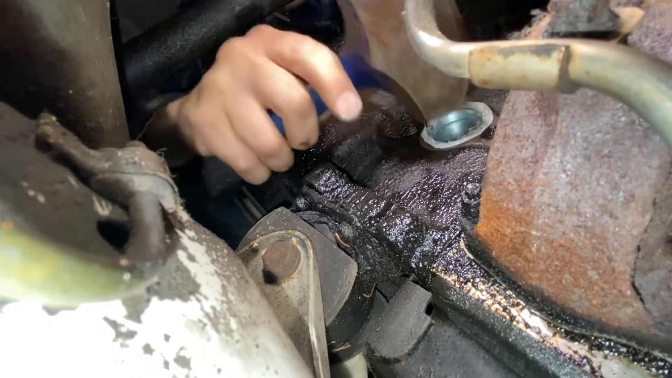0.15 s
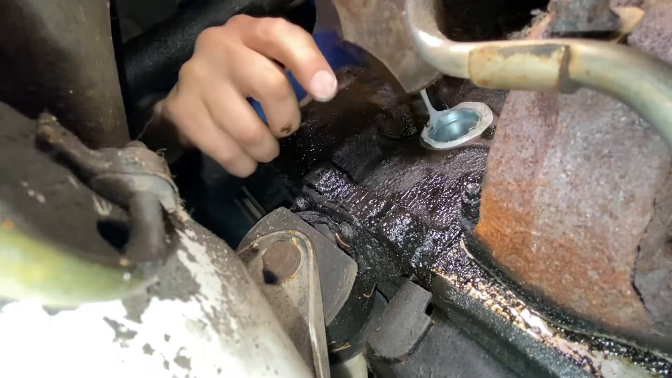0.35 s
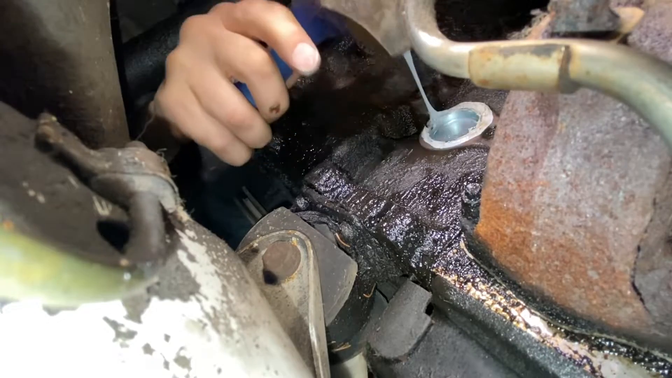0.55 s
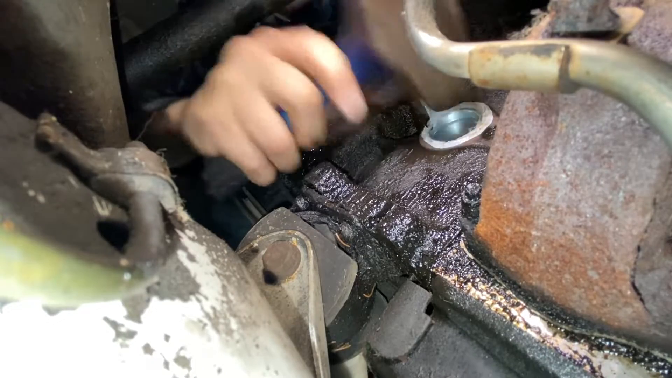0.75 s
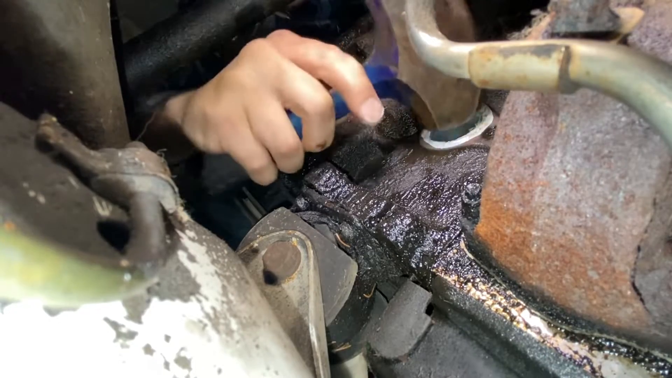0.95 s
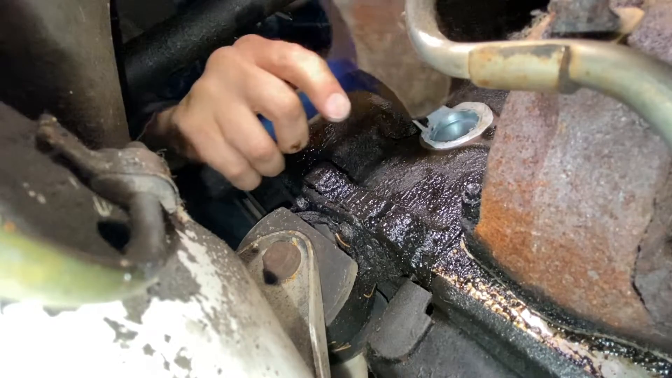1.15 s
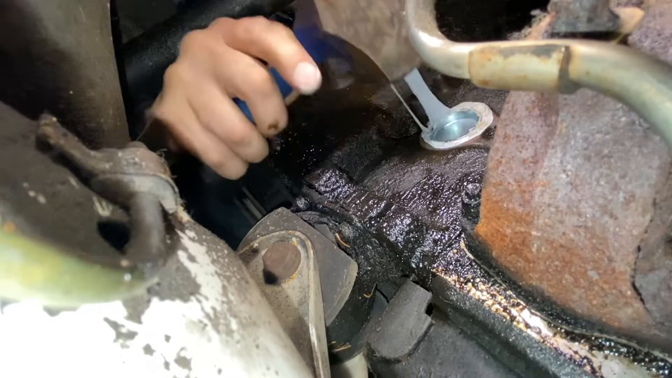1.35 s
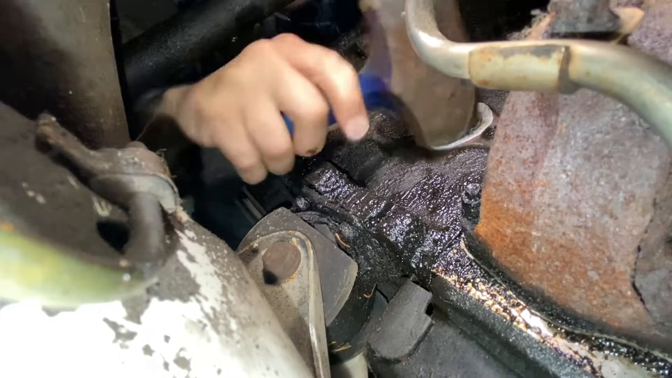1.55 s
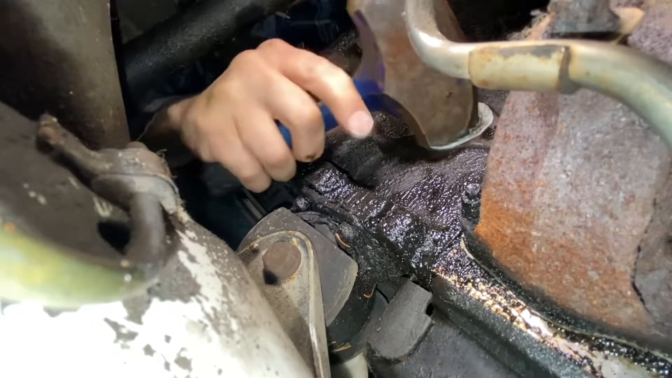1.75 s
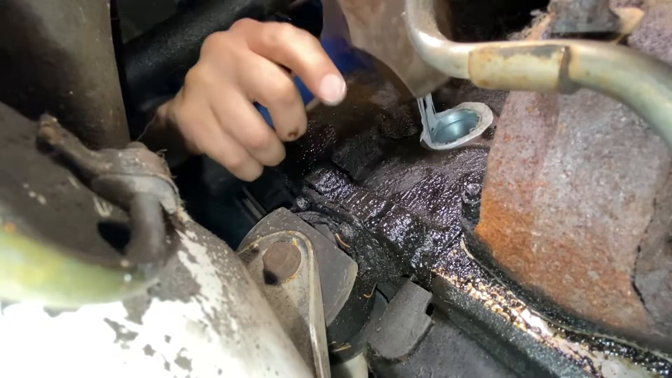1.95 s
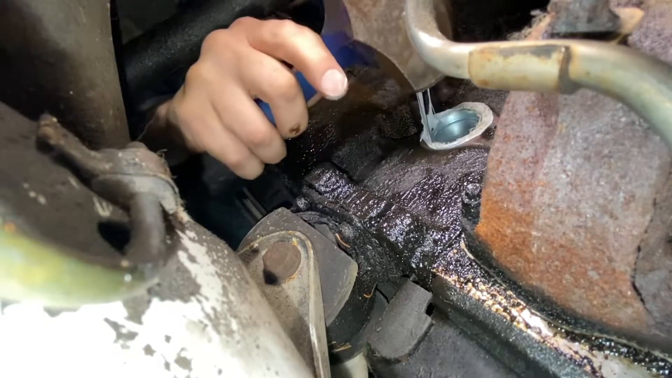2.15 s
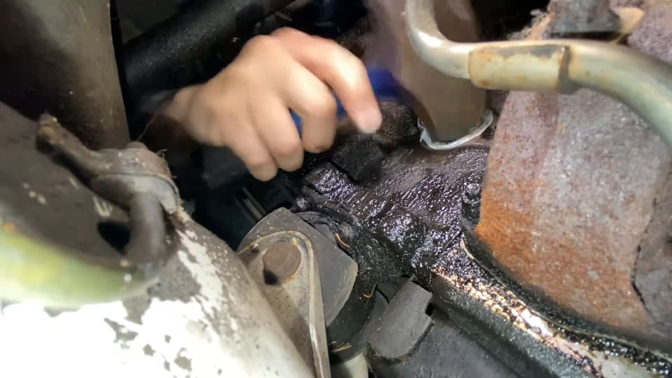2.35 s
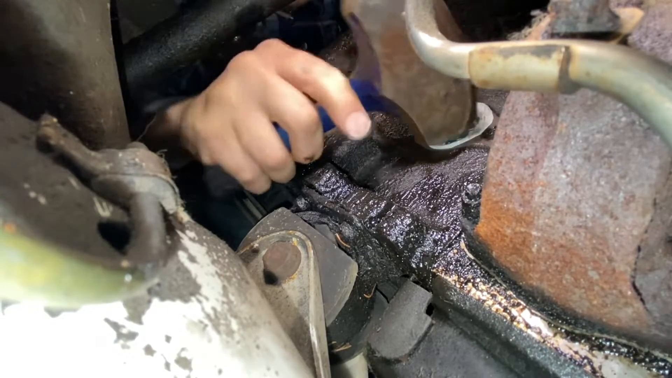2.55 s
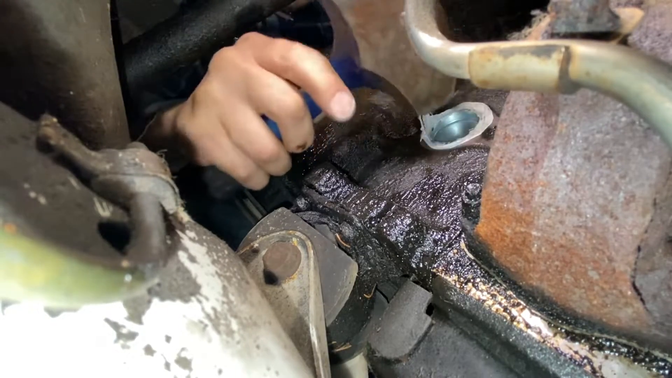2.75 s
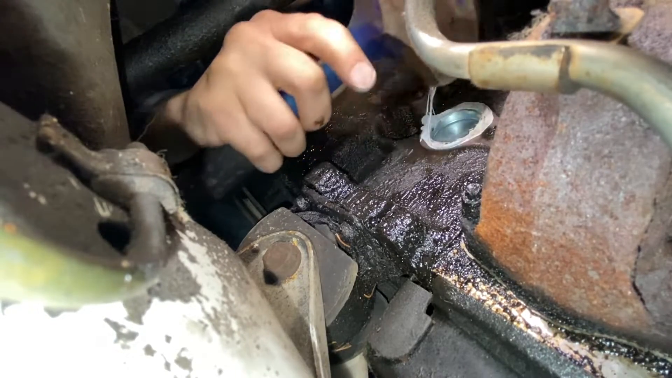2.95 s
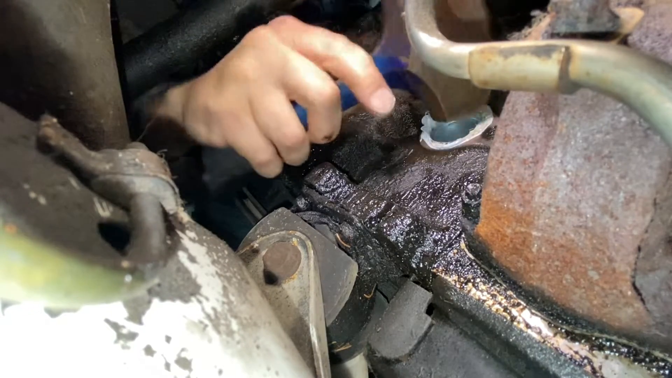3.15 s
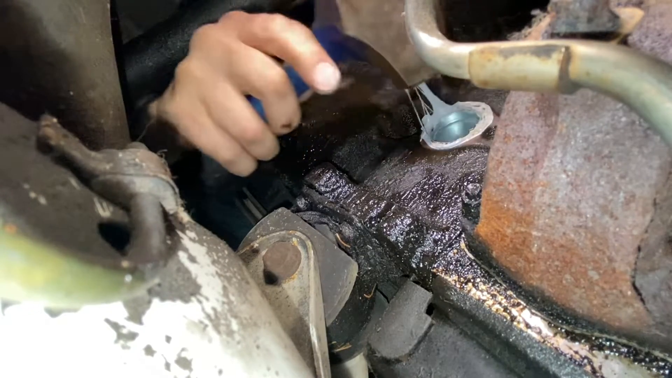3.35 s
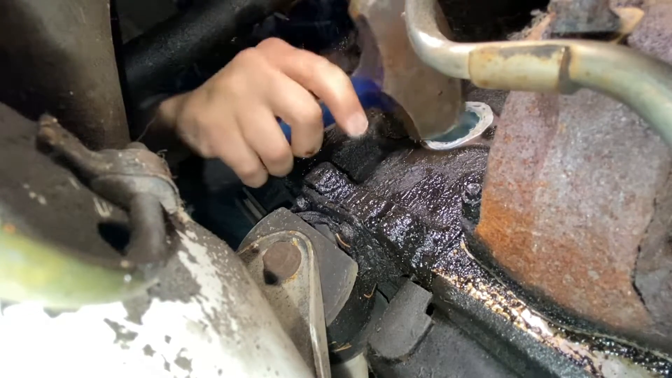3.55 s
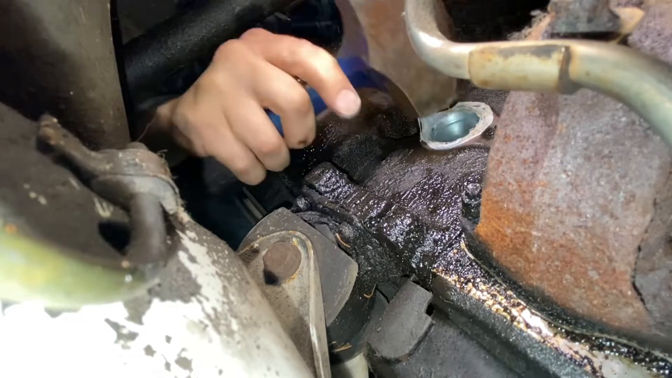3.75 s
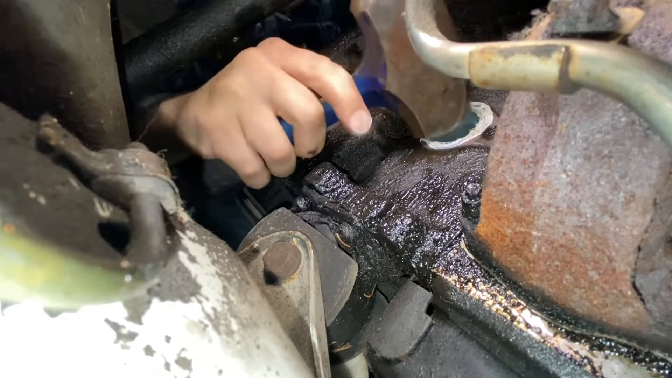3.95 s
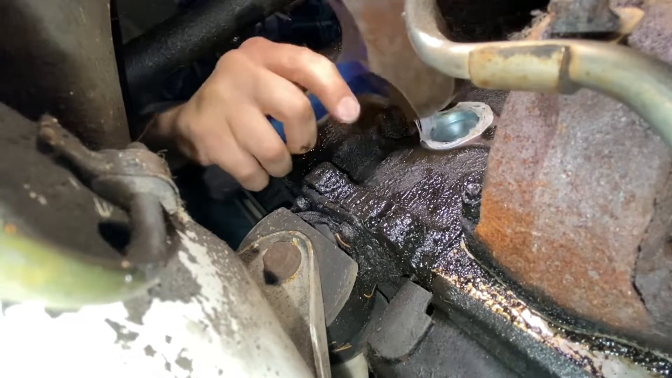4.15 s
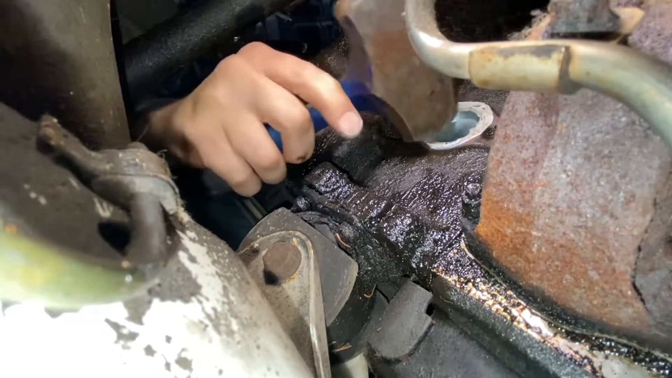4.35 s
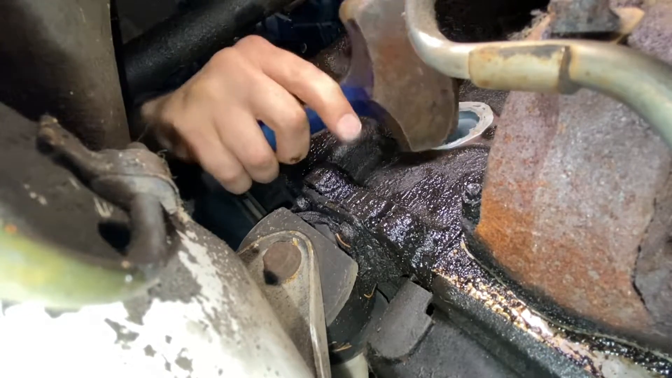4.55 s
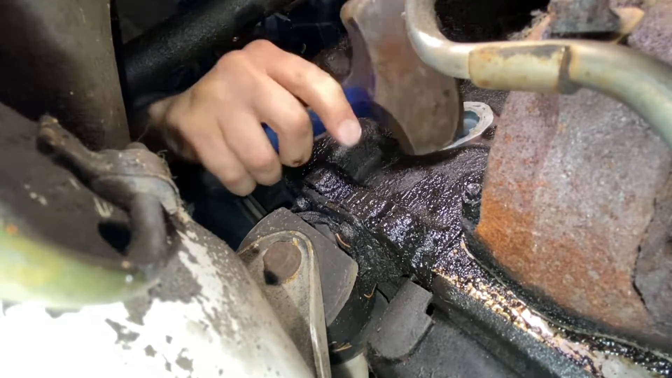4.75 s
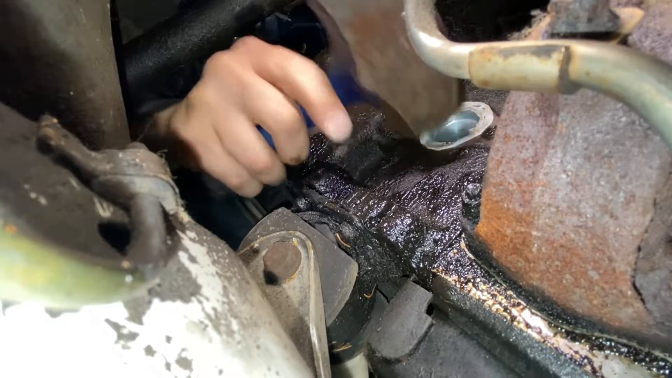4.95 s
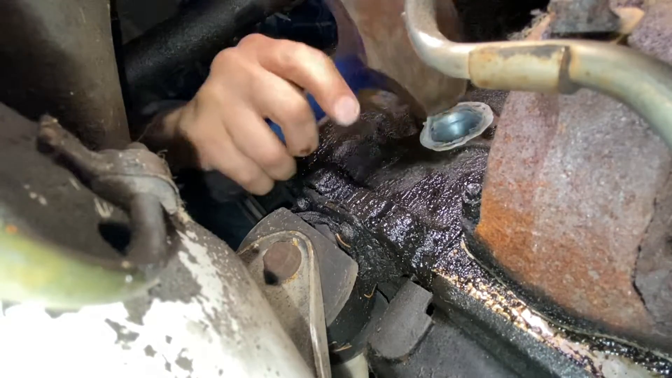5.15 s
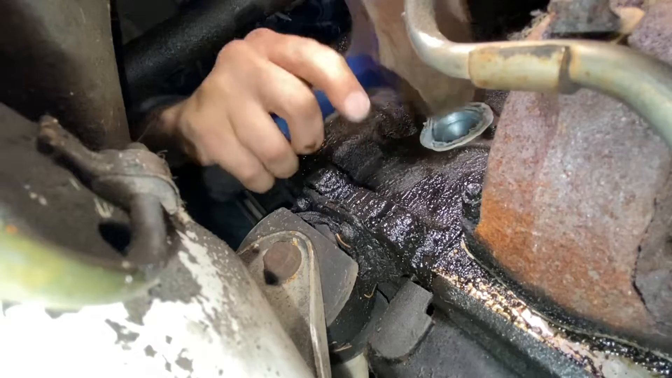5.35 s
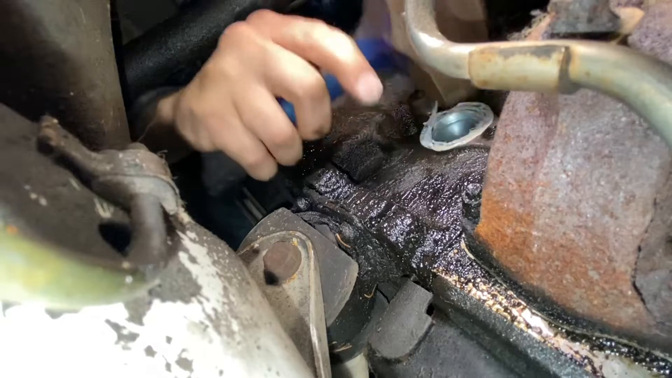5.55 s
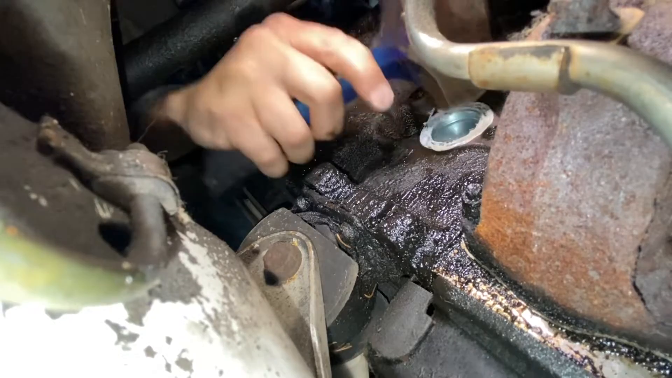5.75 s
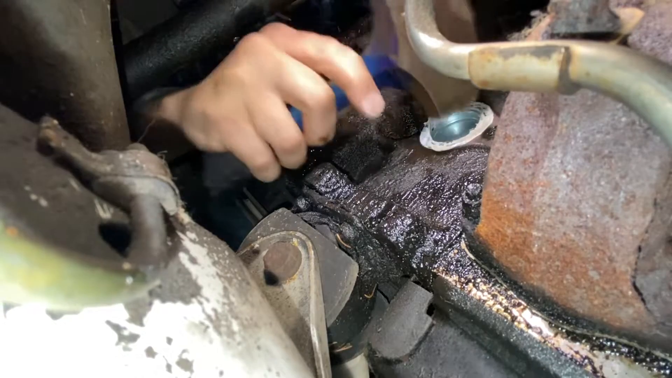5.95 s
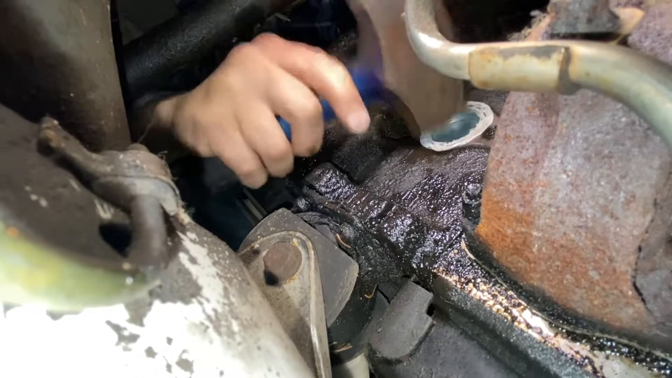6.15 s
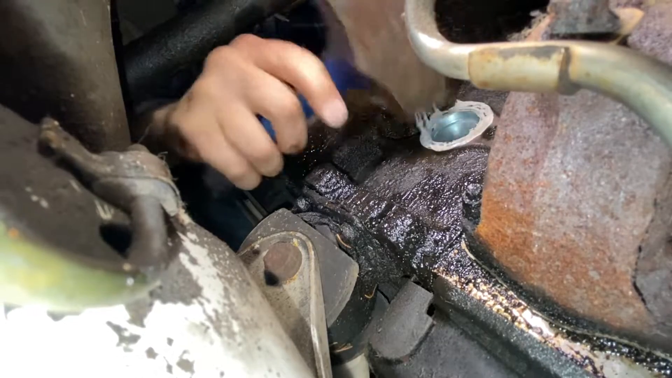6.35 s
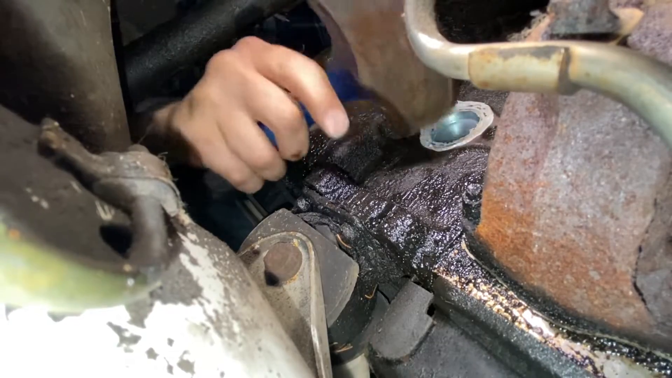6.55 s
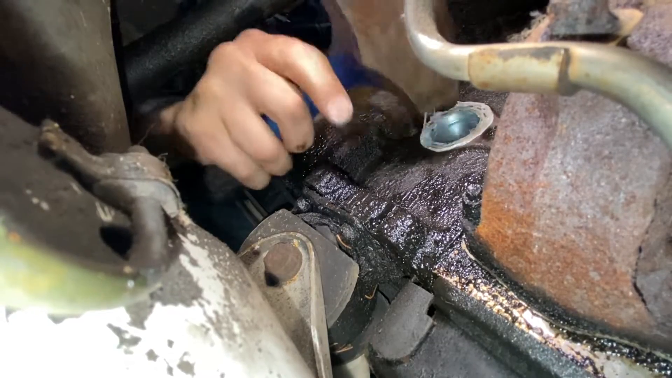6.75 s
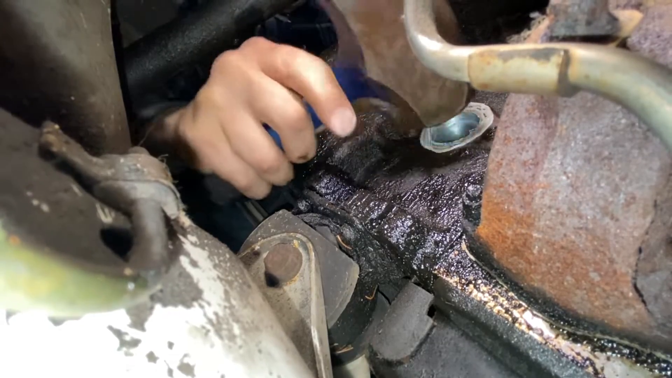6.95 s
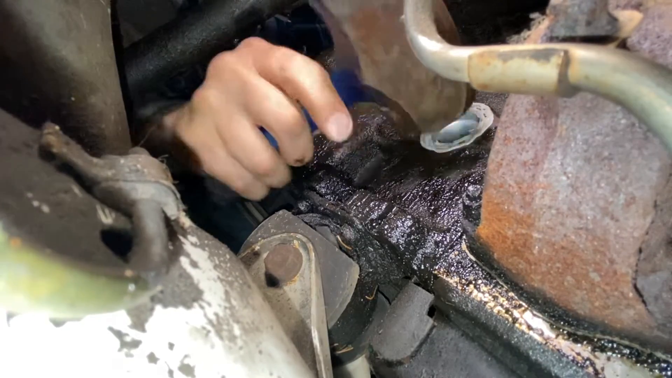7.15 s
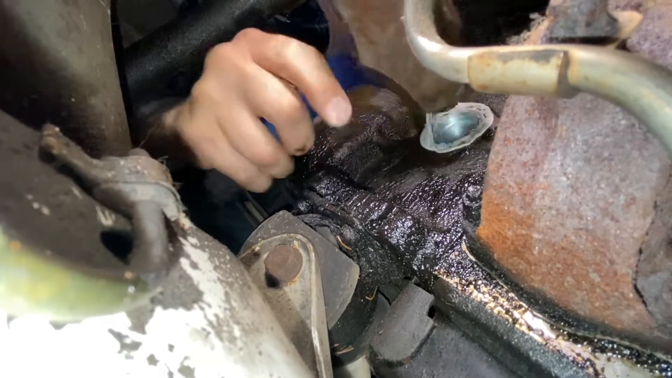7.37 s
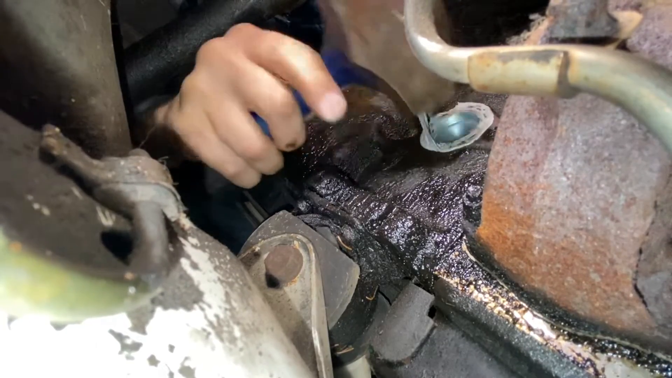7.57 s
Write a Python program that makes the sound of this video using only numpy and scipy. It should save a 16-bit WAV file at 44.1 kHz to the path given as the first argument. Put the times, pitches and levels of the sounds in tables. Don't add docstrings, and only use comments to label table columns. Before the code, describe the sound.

Close in an engine bay, a hammer strikes a steel plug set in an iron block. Blows come slowly at first, under a second apart, then tighten to over four a second. Each is a hard, short clang with a brief ring. Small knocks on a thin pipe and sticky sealant ticks fall in the gaps. The garage echo swells back after each hit over a faint low drone.

```python
import sys
import numpy as np
from scipy import signal
from scipy.fft import rfft, irfft
from scipy.io import wavfile
from scipy.ndimage import uniform_filter1d, minimum_filter1d

SR = 44100
rng = np.random.default_rng(int(sys.argv[2]) if len(sys.argv) > 2 else 0)


def wav_record(signal):
    frames = np.transpose(np.atleast_2d(signal))
    bounded = np.clip(frames, -1, 1)
    quanta = np.round(bounded * 32767).astype(np.int16)
    wavfile.write(sys.argv[1], SR, quanta)


def elevation(decibels):
    levels = np.asarray(decibels, float)
    return 10 ** (levels / 20)


N = 335601
LEAD = SR // 4


def evened(x):
    return x / np.sqrt(np.mean(x ** 2) + 1e-20)


def read(table, hz):
    f, *columns = np.transpose(table)
    return [np.interp(np.log(hz + 1), np.log(f + 1), c) for c in columns]


def add(mix, s, sound):
    part = mix[:, LEAD + round(s * SR):][:, :sound.shape[1]]
    part += sound[:, :part.shape[1]]


def ringing(hz, t60, rise, t):
    hz, t60, rise = (np.reshape(v, (-1, 1)) for v in (hz, t60, rise))
    swell = (1 - np.exp(-t / rise)) ** 2
    return swell * elevation(-60 * t / t60) * np.exp(2j * np.pi * hz * t)


def noise_pair(frames, hz, same):
    a, b, c, d = rng.standard_normal((frames, len(hz), 4)).T
    same = np.clip(same, -1, 1)[:, None]
    left, other = a + 1j * b, c + 1j * d
    return np.array([left, same * left + np.sqrt(1 - same ** 2) * other])


# frequency in Hz, level in dB.
DRONE = [(15, -55), (25, -30.5), (54, -29), (69, -4.5), (90, -8), (133, -19.5), (171, -16), (340, -18),
         (404, -31.5), (614, -32.5), (1250, -40.5), (1860, -41.5), (9000, -58.5), (11700, -82),
         (19800, -120)]
# frequency in Hz, left-right likeness from -1 to 1.
DRONE_LIKENESS = [(60, 0.79), (240, 0.79), (950, -0.026), (3770, 0.02), (15000, 0.01)]
DRONE_DB = -55.5


def hum():
    frames, hz = N // 512 + 5, np.fft.rfftfreq(2048, 1 / SR)
    patches = uniform_filter1d(rng.standard_normal((len(hz), frames)), 5, 0)
    patches = evened(uniform_filter1d(patches, 12, 1))
    colour_db = read(DRONE, hz)[0][:, None] + 1.5 * patches
    spectra = noise_pair(frames, hz, read(DRONE_LIKENESS, hz)[0]) * elevation(colour_db)
    drone = signal.istft(spectra, nperseg=2048, noverlap=1536)[1][:, :N]
    return elevation(DRONE_DB) * evened(drone) * elevation([[1.5], [-1.5]])


# frequency in Hz, t60 in seconds, level in dB,
# left-right likeness from -1 to 1.
GARAGE_ECHO = [(103, 0.99, -18, 0.025), (252, 1.14, 5, 1), (610, 0.82, 7.5, -0.57),
               (1620, 0.72, 6.5, -0.04), (2982, 0.86, -3.5, 0.076), (4150, 1.05, -1, 0.025),
               (5500, 0.83, 0.5, 0.0077), (8500, 0.7, -4.5, 0), (12100, 0.63, -20.5, -0.12),
               (13000, 0.38, -15, 0.13)]
SLOW_ECHO_DB, MAIN_ECHO_DB = -32, -14.5


def garage(x):
    out, turn = 0, np.arange(x.shape[1]) / SR * 1.37 * np.pi
    hz, t = np.fft.rfftfreq(256, 1 / SR), np.arange(700) * 64 / SR
    t60, db, same = read(GARAGE_ECHO, hz)
    slow_echo = elevation(SLOW_ECHO_DB - 60 * t / 1.4) * np.clip(t / 0.036, 0, 1) / np.sqrt(.16)
    main_echo = elevation(MAIN_ECHO_DB - 60 * t / t60[:, None]) * np.clip(t / 0.014, 0, 1) / np.sqrt(t60[:, None])
    sent = (x.mean(0) + 0.46 * (x[0] - x[1]))[None]
    for k in range(3):
        spectra = noise_pair(len(t), hz, same) * elevation(db)[:, None] * np.hypot(slow_echo, main_echo)
        tail = signal.istft(spectra, nperseg=256, noverlap=192)[1] / 400
        share = np.sqrt(2 / 3) * abs(np.cos(turn + k * np.pi / 3))
        out = out + signal.fftconvolve(sent * share, tail, axes=1)[:, :x.shape[1]]
    return out


# start in seconds, peak in dB, length in seconds.
SEALANT_TEARS = [(0.566, -69, 0.039), (0.583, -44, .022), (0.615, -42.5, 0.011), (0.631, -50.5, 0.036),
                 (0.667, -50.5, 0.04), (0.769, -77, .03), (3.334, -57, 0.05), (4.009, -37, 0.0093),
                 (4.065, -42, .015), (4.311, -45, .02), (4.361, -71, 0.033)]
# frequency in Hz, level in dB.
SEALANT_COLOUR = [(880, -70.5), (1500, -22.5), (1820, -32.5), (3550, -31), (5150, -16.5), (9410, -31),
                  (13200, -17.5), (14900, -23.5), (16500, -14)]


def tears():
    snaps = rng.standard_normal((2, N + LEAD)) * elevation(2.7 * rng.exponential(1, N + LEAD))
    hz = np.fft.rfftfreq(N + LEAD, 1 / SR)
    snaps = evened(irfft(rfft(snaps) * elevation(read(SEALANT_COLOUR, hz)[0]), N + LEAD))
    level = np.zeros((2, N + LEAD))
    for s, db, length in SEALANT_TEARS:
        add(level, s, elevation(db) * signal.windows.tukey(int(length * SR), .7)[None])
    return level * snaps


def band(x, low_hz, high_hz):
    return signal.lfilter(*signal.butter(2, [low_hz, high_hz], "band", fs=SR), x)


# frequency in Hz, t60 in seconds, then level in dB over the peak
PIPE_MODES = [(448, 0.29, -5, -10.5, -4.5, -5), (564, 0.16, -3, 2.5, 3, -24),
              (1055, 0.2, -16, -16, -4, -4.5), (1319, 0.11, -14.5, -7, -6, -7),
              (1787, 0.13, -9, -10.5, -8, -14), (2450, .1, -15.5, -17.5, -14.5, -18),
              (2620, 0.15, -14, -18.5, -31.5, -20), (3287, .18, -10.5, -21.5, -26, -4.5),
              (4320, .1, -11, -9.5, -22, -18), (4950, 0.13, -13, -16, -25.5, -24),
              (6250, .12, -20.5, -19.5, -22.5, -19), (7000, .15, -33.5, -12.5, -34, -26)]
# start in seconds, peak in dB, 8-15.5 kHz top in dB over the peak, t60 of
# the grit in seconds.
PIPE_TOUCHES = [
    (0.273, -27.5, -17.5, 0.081),
    (.693, -40.5, -11, 0.11),
    (.711, -38, -1.5, 0.048),
    (2.046, -37, -22.5, 0.042),
    (3.342, -30.5, -8, 0.055),
]
TOUCH_PLACES = (0, 1, 1, 2, 3)
PLACE_RING = (-2, 0.5, -6, -0.5)


def touches():
    t, out = np.arange(SR // 4) / SR, np.zeros((2, N + LEAD))
    hz, t60, *places_db = np.transpose(PIPE_MODES)
    pipe = ringing(hz, t60, 2.0 / hz, t)
    for (s, peak_db, top_db, grit_t60), place in zip(PIPE_TOUCHES, TOUCH_PLACES):
        phases = np.exp(2j * np.pi * rng.random((2, len(hz))))
        ring = (elevation(places_db[place] + PLACE_RING[place]) * phases) @ pipe
        grit = rng.standard_normal((2, len(t))) * elevation(-60 * t / grit_t60) * np.clip(t / 0.0027, 0, 1)
        tick = band(grit, 500, 6000)
        tick += elevation(top_db) * band(grit, 8000, 15500)
        tick += elevation(8.5) * band(grit * elevation(30 * t / grit_t60), 420, 720)
        add(out, s, elevation(peak_db) * (ring.real + elevation(0.5) * tick))
    return out


CLINK_S, CLINK_DB, CLINK_FROM_HZ = 5.6005, -12, 2000
CLINK_DAMPING = 0.6


def clink():
    t, out = np.arange(SR // 6) / SR, np.zeros((2, N + LEAD))
    hz, t60, bend_db, clamp_db = np.transpose(PIPE_MODES)[:4]
    woken = elevation([bend_db, clamp_db]) * (hz > CLINK_FROM_HZ)
    ring = woken @ ringing(hz, CLINK_DAMPING * t60, 2.8 / hz, t)
    add(out, CLINK_S, elevation(CLINK_DB) * ring.imag)
    return out


# frequency in Hz,
# width in Hz, level in dB.
BAY_COLOUR = [(122.8, 18, -7), (162.5, 26, 4.5), (212, 45, 3.5), (265, 40, -4.5), (380.6, 53, -7),
              (610, 37, 2), (732, 90, -8.5), (992, 56, 8.5), (2230, 1100, 1.5), (3520, 1000, -1),
              (5300, 440, 1), (6560, 630, -2.5)]


def bay_db(hz):
    return sum(db / (1 + (2 * (hz - f) / width) ** 2) for f, width, db in BAY_COLOUR)


BLOW_BANDS = (240, 620, 1300, 3000, 5300, 8500, 12000, 13500)
THUD_DB, THUD_DB_PER_S = 1.5, -1.12
CLANG_DB, CLANG_WEIGHT_SHARE = 5.5, 0.73
CLANG_DB_PER_OCTAVE = -4
PING_DB, PING_DB_PER_S = -8, -0.75
TOP_DB, TOP_SNAP_SHARE = -15, 0.5
GROUP_DB, GROUP_DB_PER_S, GROUP_WIDTH_HZ = 2.7, 1.21, 220
GROUP_FAR_SHARE, GROUP_FAR_HZ = .9, 5300


def tone_db(hz, share, s, bite_db, weight_db, snap_db, group_hz):
    thud_db = weight_db + THUD_DB + THUD_DB_PER_S * s
    clang_db = CLANG_DB + CLANG_WEIGHT_SHARE * weight_db + (1 - CLANG_WEIGHT_SHARE) * bite_db
    clang_db += CLANG_DB_PER_OCTAVE * np.log2(group_hz / 3700)
    ping_db = bite_db + PING_DB + PING_DB_PER_S * s
    top_db = TOP_DB + TOP_SNAP_SHARE * snap_db
    bands = (thud_db, weight_db, clang_db, bite_db, ping_db, top_db, top_db, snap_db)
    group_db = (GROUP_DB + GROUP_DB_PER_S * s) * (group_hz / GROUP_FAR_HZ) ** 0.65
    group_db = group_db / (1 + ((hz - group_hz) / GROUP_WIDTH_HZ) ** 2)
    return read(list(zip(BLOW_BANDS, bands)), hz)[0] + share * group_db


# start in seconds, bite of the steel face in dB, weight of
# the swing in dB, snap of the contact in dB, mode group nearest the landing spot in Hz.
HAMMER_BLOWS = [(0.7971, -13.5, -23, -15, 6500), (1.5564, -12.5, -24.5, -15.5, 5300),
                (2.3805, -10, -18, -10, 4800), (3.053, -7, -20, -22, 2620), (3.1174, -27.5, -35, -59, 2450),
                (3.574, -17.5, -24.5, -23, 3000), (3.9608, -10, -22, -23, 2770),
                (4.2486, -13.5, -22.5, -17.5, 2970), (4.4927, -16.5, -23, -14.5, 3600),
                (4.7453, -18.5, -21, -32.5, 3300), (5.018, -13.5, -22, -37, 5160),
                (5.2575, -14, -17, -20, 5400), (5.495, -9.5, -22.5, -19, 4820),
                (5.6009, -21, -51, -22.5, 4400), (5.7063, -12.5, -23.5, -21, 2630),
                (5.9372, -12.5, -22.5, -18.5, 2640), (6.1668, -10, -23.5, -19.5, 2720),
                (6.3967, -10.5, -22, -20, 5620), (6.6009, -15, -23, -25, 5450),
                (6.8148, -16.5, -23.5, -11, 5720), (7.0271, -12.5, -23, -28.5, 5300),
                (7.232, -12.5, -25, -29, 5300), (7.4549, -13, -26.5, -26.5, 5300)]
# bite, weight and snap in dB, mode group in Hz.
BLOW_BEFORE = (-7.5, -22, 2.5, 2404)
BEFORE_S = -.13
# frequency in Hz, left in dB, right in dB, t60 in seconds.
BLOCK_RINGS = [(235.9, 7.5, -7.5, 0.16), (306.4, 3.5, 3.5, 0.07), (493.4, 2.5, 9, 0.087),
               (664.6, 2, 6, 0.15), (624.5, -9, -4, 0.091), (947, 4, -6, 0.08), (1056.5, -9, -15, 0.12),
               (1402, -16.5, -27, 0.23), (1475, -8.5, -1.5, 0.075), (1565, -17.5, -27, 0.12),
               (1754, -6, -9.5, 0.12), (2274, -19.5, -33, 0.23), (2590, -11.5, -10.5, 0.092),
               (3620, -23, -16.5, .08), (4820, -8.5, -2, 0.054), (5232, 3, -11, 0.055),
               (5230, -7, -9, 0.079), (5760, -15, -17, 0.073)]
# frequency in Hz, level in dB, left minus right in dB,
# left-right likeness, t60 in seconds, rise in seconds.
CASTING = [(58.7, 12, 20, -.6, 0.071, 0.0021), (160, 16, 12, -0.11, 0.079, 0.004),
           (322, 14, 8, -1.7, 0.047, 0.0027), (370, 2.5, 7.5, -0.76, 0.099, 0.0025),
           (638, 10, -11.5, -0.6, 0.064, 0.0016), (1380, -4, 11.5, -0.45, 0.049, 0.0025),
           (3000, -5, 5, 0.19, 0.022, 0.00093), (3980, -4.5, 8.5, -0.39, 0.046, 0.0016),
           (5300, 1, 15.5, -0.00097, 0.029, 0.0009), (8100, 0, 7, -0.09, 0.038, 0.00098),
           (9080, -3.5, -19, 0.57, 0.0097, 0.0012), (11900, -7.5, 1, 0.74, 0.021, 0.00033),
           (12450, -11.5, -7, -0.42, 0.017, .001), (16000, -15.5, 8.5, -.2, .008, .001)]
# frequency in Hz, level in dB.
CRACK_TOP = [(8800, 0.5), (9500, -11.5), (10200, 6), (12200, 4), (12600, -4.5)]
OVERLOAD_DB = 15
KNOCK_LUMPS = 1.64
STEADY_HZ = 2400
FAR_RING_HZ = 3000


def blows():
    t, near, far = np.arange(SR // 6) / SR, np.zeros((2, N + LEAD)), np.zeros((2, N + LEAD))
    hz = 16650 * ((np.arange(400) + rng.random(400)) / 400) ** 1.7 + 62
    db, lean_db, same, t60, rise = read(CASTING, hz)
    same = np.clip(same, -1, 1)
    dense = ringing(hz, t60 * elevation(2.4 * rng.standard_normal(400)), rise, t)
    spacing = np.sqrt(np.gradient(np.sort(hz)))
    ears = elevation(db + bay_db(hz) + np.outer([.5, -.5], lean_db)) * spacing / 110

    ring_hz, left_db, right_db, ring_t60 = np.transpose(BLOCK_RINGS)
    rings = ringing(ring_hz, ring_t60, 0.63 * read(CASTING, ring_hz)[4], t)
    count = len(ring_hz)
    far_fade = elevation(-60 * t / .15)
    crack_hz = np.fft.rfftfreq(2048, 1 / SR)
    crack_colour_db = read(CASTING, crack_hz)[0] + bay_db(crack_hz) + read(CRACK_TOP, crack_hz)[0]
    far_share = GROUP_FAR_SHARE * (crack_hz / GROUP_FAR_HZ) ** 2
    usual, loose = rng.random((2, 400)), np.clip(hz / STEADY_HZ, .05, 1)

    for s, *blow in [(BEFORE_S, *BLOW_BEFORE), *HAMMER_BLOWS]:
        a, b = np.exp(2j * np.pi * (usual + loose * rng.random((2, 400))))
        spot = np.array([a, same * a + np.sqrt(1 - same ** 2) * b])
        wake = elevation(0.5 * rng.standard_normal(count)) * np.exp(.4j * rng.standard_normal(count))
        sides = np.exp(1j * (np.pi + 0.88 * rng.standard_normal(count)) * [[0], [1]])
        struck = wake * sides * elevation([left_db, right_db]) * elevation(tone_db(ring_hz, 0.86, s, *blow) - 12)
        ring = (struck @ rings).imag
        low_ring = (struck * (ring_hz < FAR_RING_HZ) @ rings).imag

        lumps_db = 1.64 * evened(uniform_filter1d(rng.standard_normal(1025), size=20))
        knock_db = KNOCK_LUMPS * loose * np.interp(hz, crack_hz, lumps_db)
        clang = (spot * ears * elevation(tone_db(hz, 1, s, *blow) + knock_db + 6)) @ dense
        add(near, s, elevation(OVERLOAD_DB) * (clang.real + ring))

        crack_db = crack_colour_db + tone_db(crack_hz, far_share, s, *blow) + lumps_db
        crack = np.roll(irfft(elevation(crack_db)), 1024)
        add(far, s - 800 / SR, elevation(OVERLOAD_DB + 20) * np.array([crack, crack]))
        add(far, s, elevation(OVERLOAD_DB - 3.5) * far_fade * low_ring)
    return near, far


def scene():
    near, far = blows()
    small = touches() + tears() + clink()
    return (near + small + garage(far + elevation(-1.5) * small))[:, LEAD:] + hum()


# frequency in Hz, level in dB a bin.
FAINTEST = [(300, -110), (1500, -99), (6000, -87), (8800, -91), (9500, -83.5), (10300, -100), (12200, -100),
            (12600, -74), (16300, -78.5), (16800, -57.5)]
SMEAR_DB = -12.5


def smear(x):
    hz, t, z = signal.stft(x, SR, nperseg=1536)
    a, b = rng.standard_normal((2, *z.shape))
    patches = uniform_filter1d(rng.standard_normal(z.shape), size=12, axis=1) > .17
    rustle = abs(z) * (a + 1j * b) * patches * (hz < 8800)[:, None]
    power = uniform_filter1d(abs(z) ** 2, size=9, axis=1)
    kept = power / (abs(power) + elevation(2 * read(FAINTEST, hz)[0])[:, None])
    return signal.istft(kept * z + elevation(SMEAR_DB) * rustle, SR, nperseg=1536)[1][:, :N]


def band_limit(x):
    return signal.sosfilt(signal.butter(12, 16960, fs=SR, output="sos"), x)


def record(dry):
    peak_db = 20 * np.log10(-minimum_filter1d(-abs(dry).max(0), size=90) + 1e-9)
    climb = np.arange(N) * 51.0 / SR
    start_db = 6. - climb
    held_db = np.maximum.accumulate(peak_db + climb) - climb - 3.
    over_db = np.maximum(held_db, np.maximum(start_db, 0))
    ducked = dry / elevation(uniform_filter1d(over_db, size=45))
    rounded = .94 * ducked / (1 + ducked ** 4) ** .25
    finished = np.clip(smear(rounded), -.96, .96)
    return band_limit(finished)


dry = scene()
out = record(dry)
wav_record(out)
```